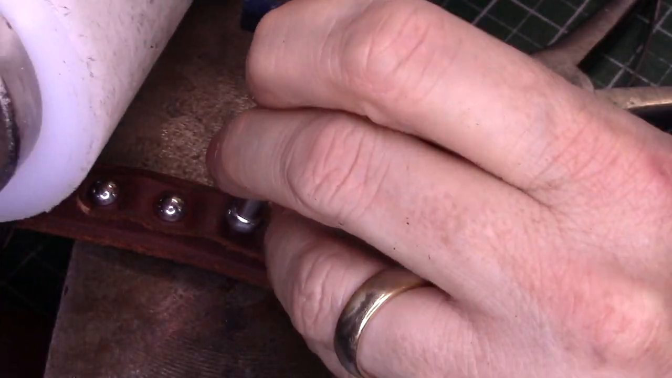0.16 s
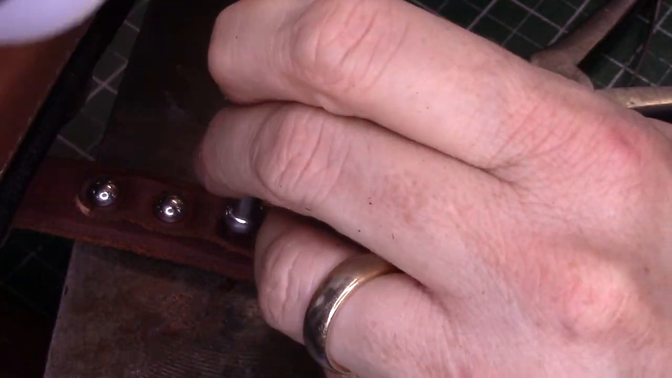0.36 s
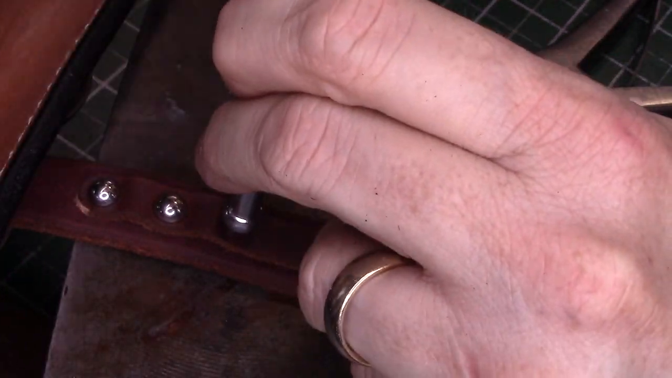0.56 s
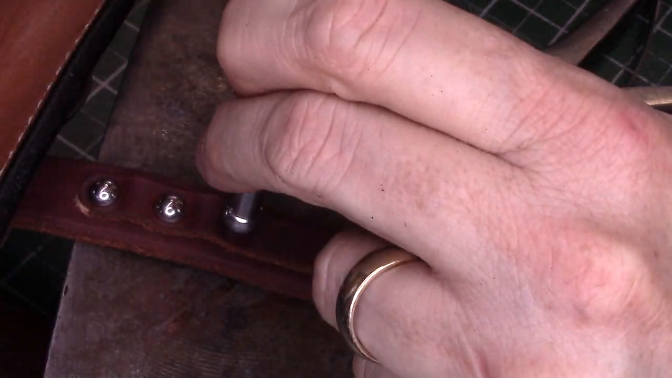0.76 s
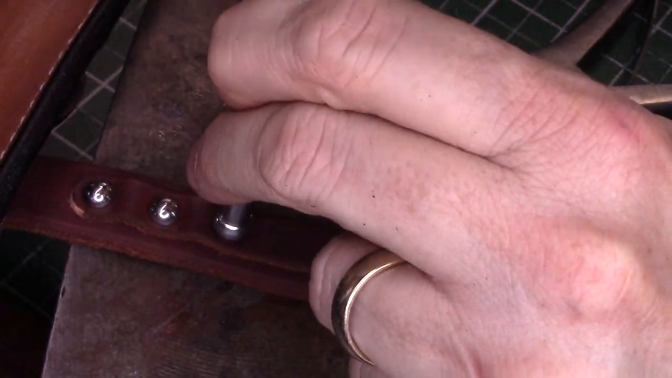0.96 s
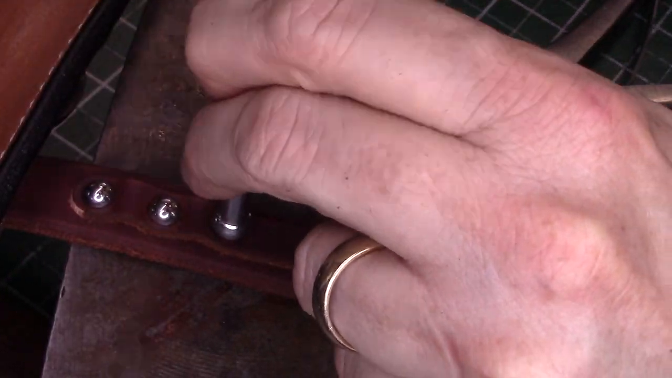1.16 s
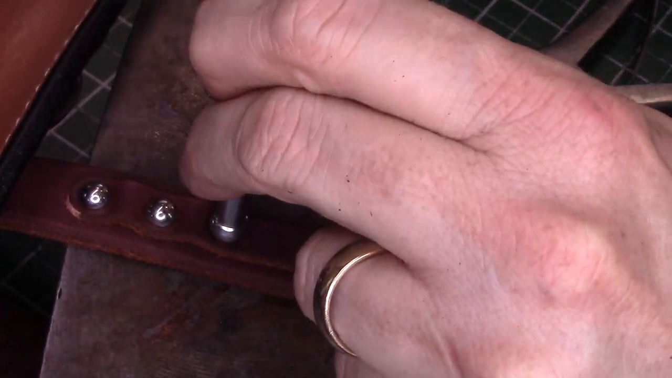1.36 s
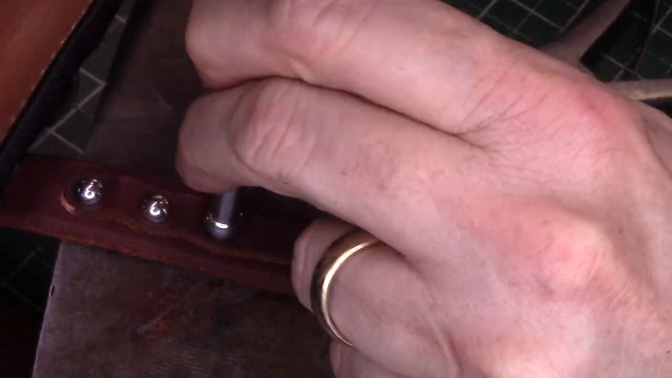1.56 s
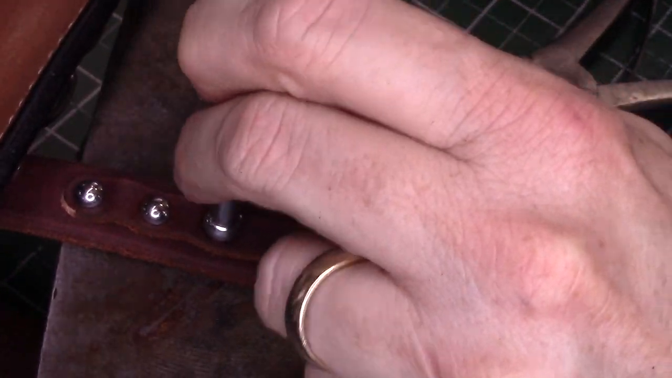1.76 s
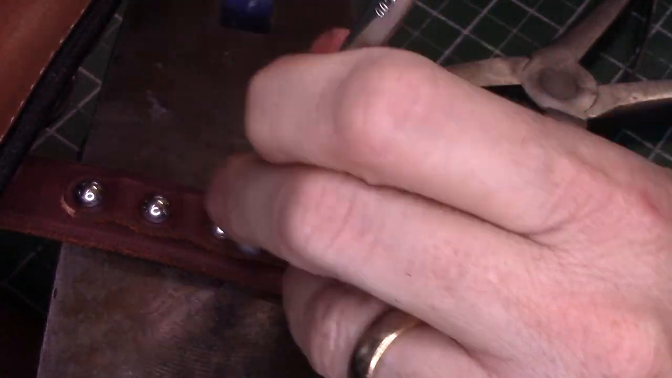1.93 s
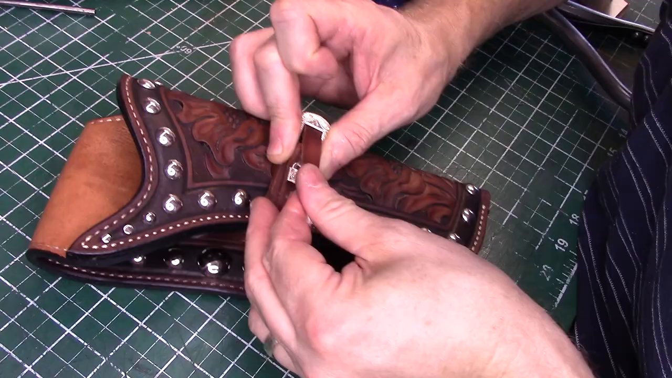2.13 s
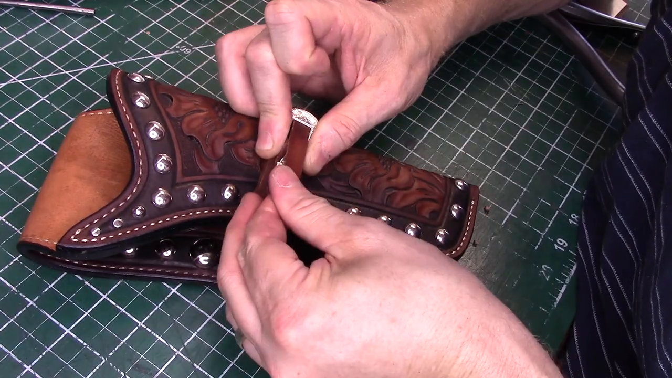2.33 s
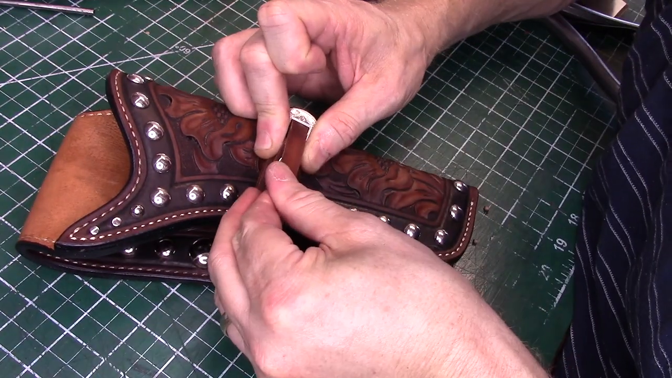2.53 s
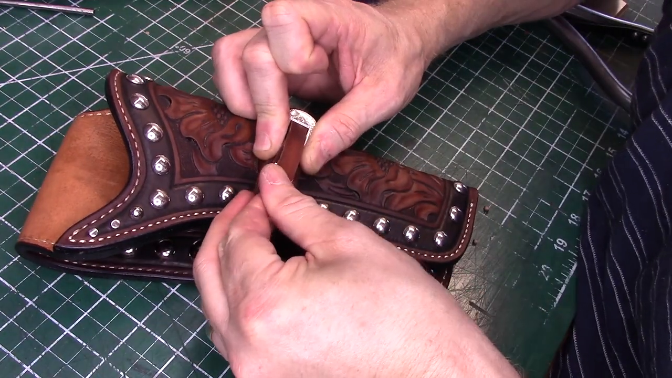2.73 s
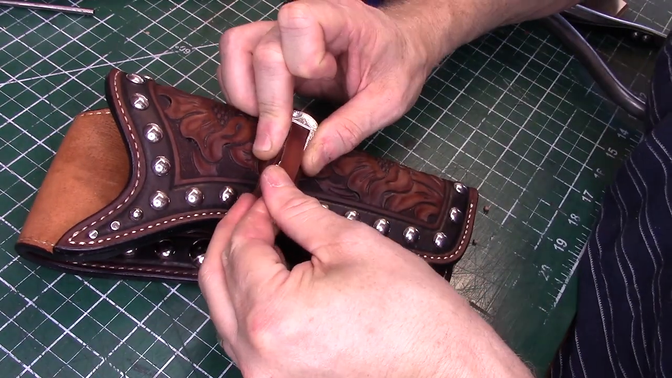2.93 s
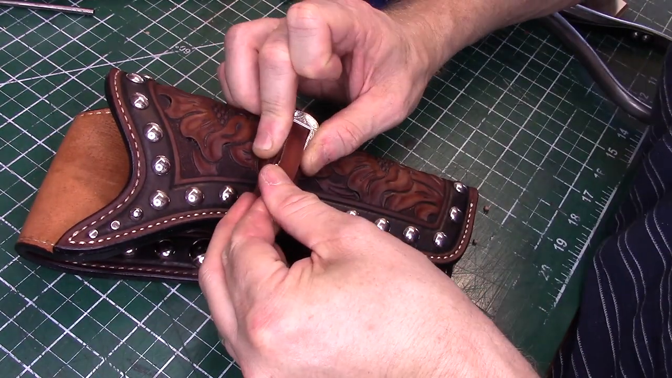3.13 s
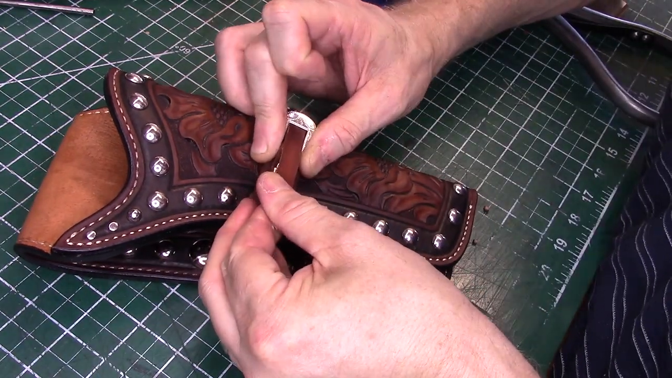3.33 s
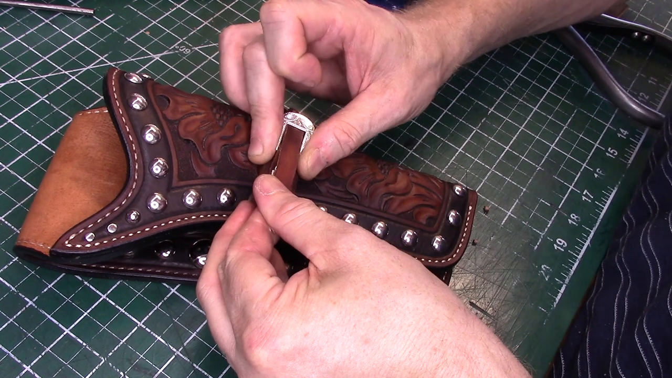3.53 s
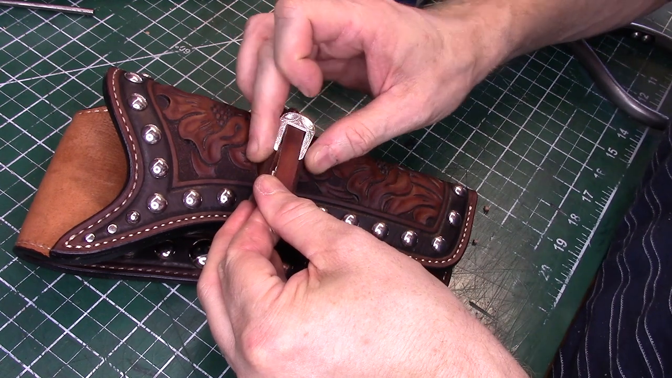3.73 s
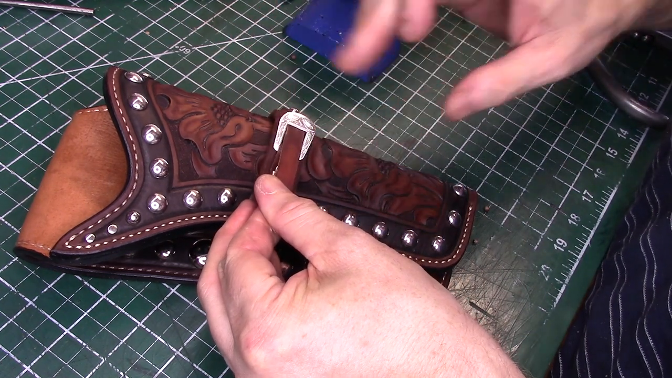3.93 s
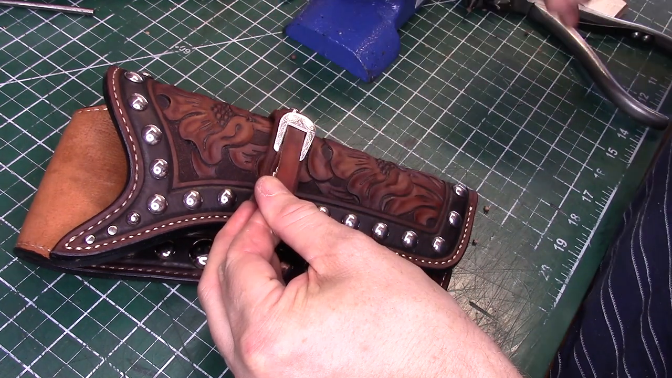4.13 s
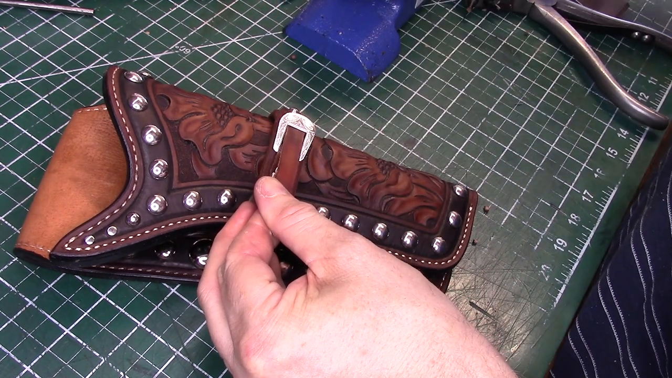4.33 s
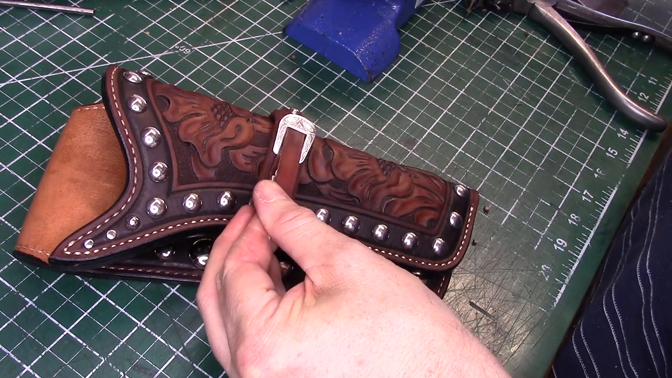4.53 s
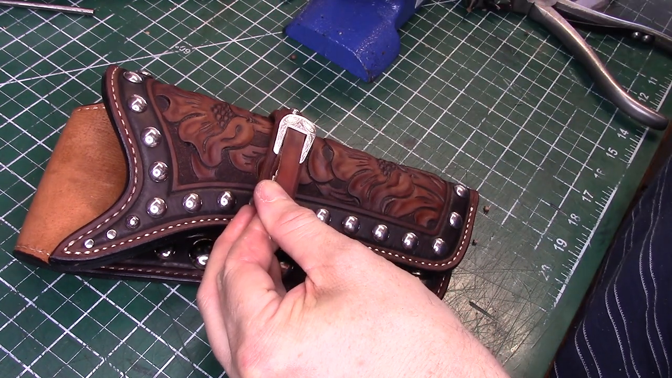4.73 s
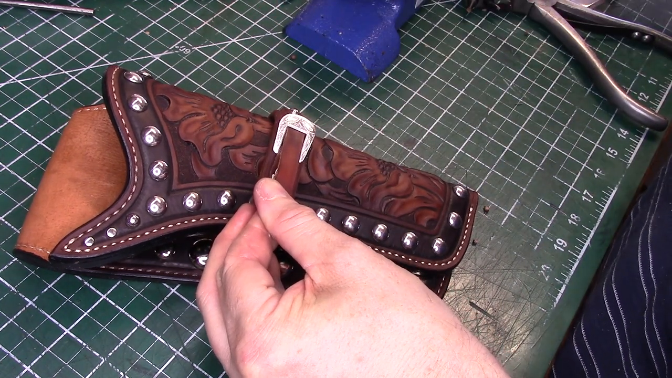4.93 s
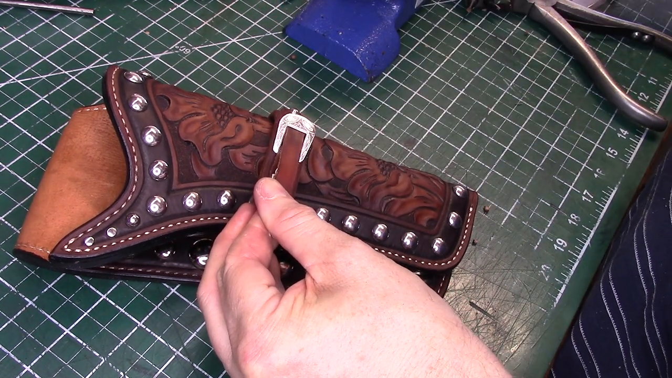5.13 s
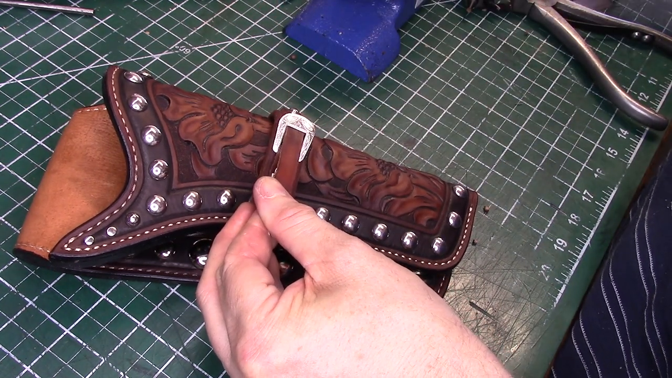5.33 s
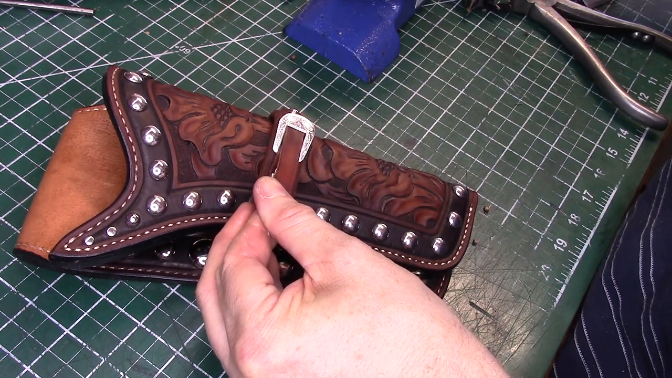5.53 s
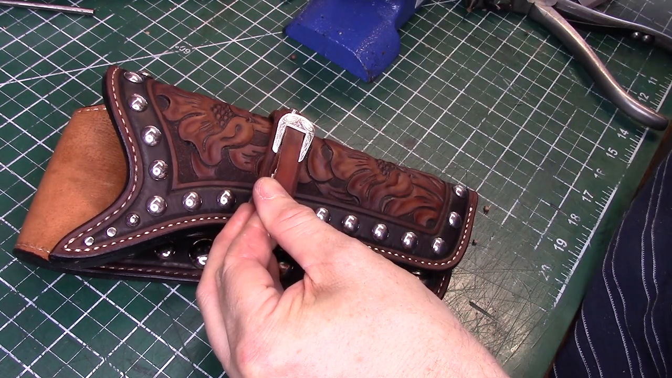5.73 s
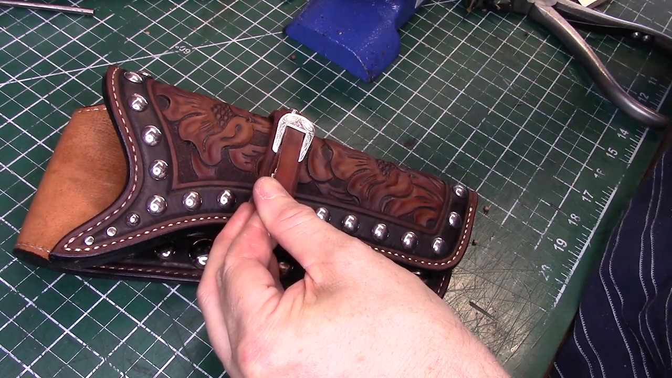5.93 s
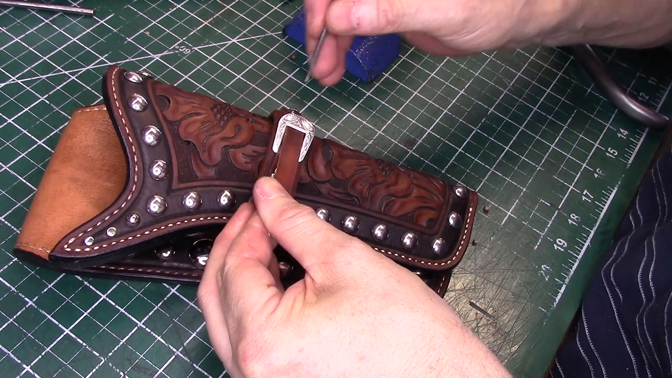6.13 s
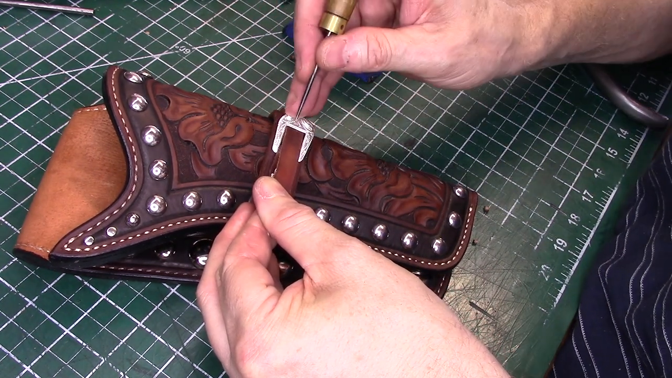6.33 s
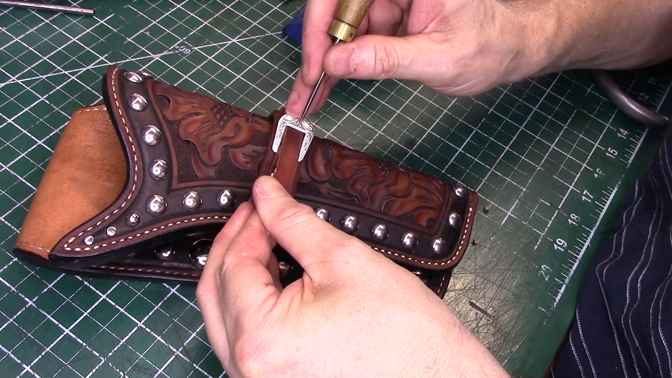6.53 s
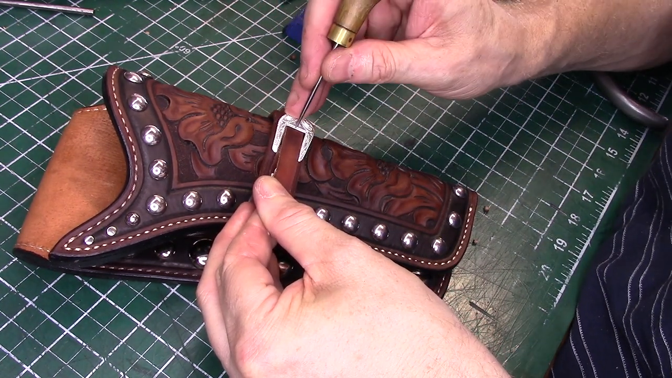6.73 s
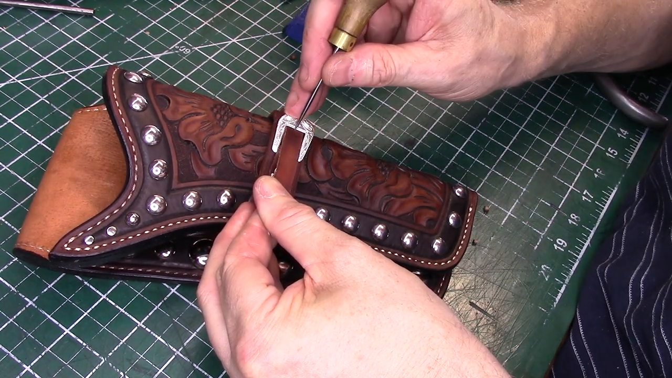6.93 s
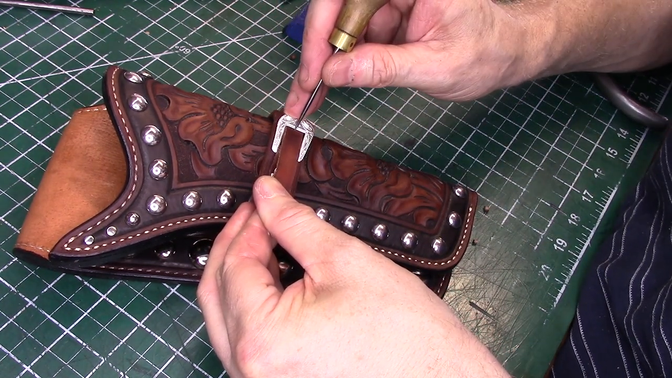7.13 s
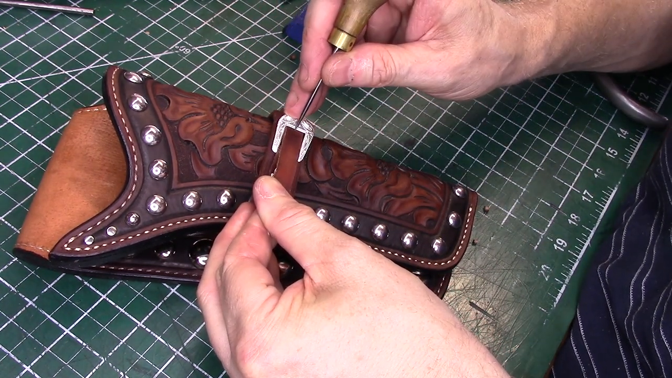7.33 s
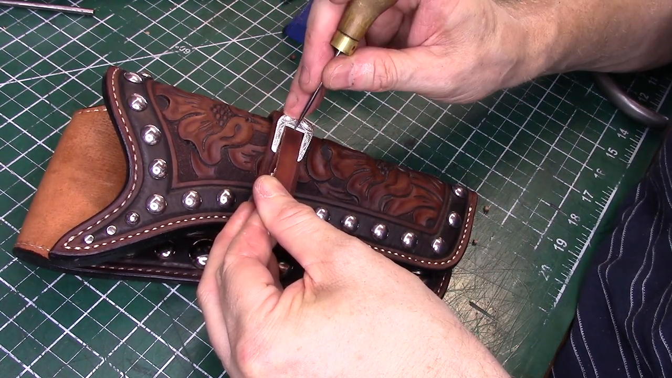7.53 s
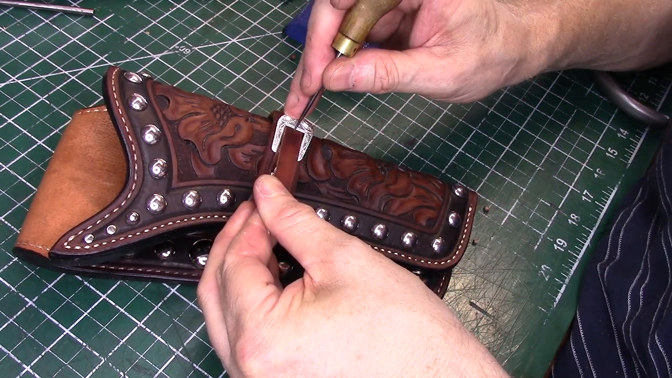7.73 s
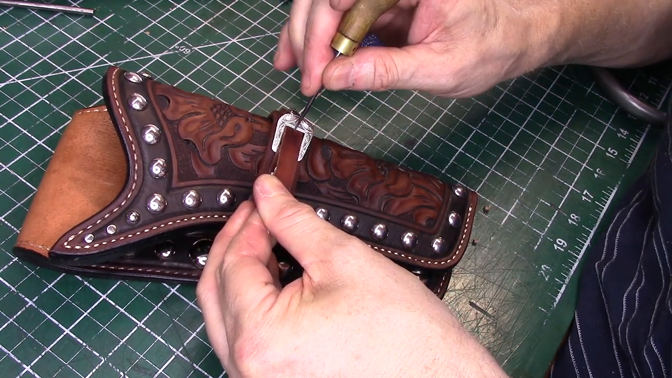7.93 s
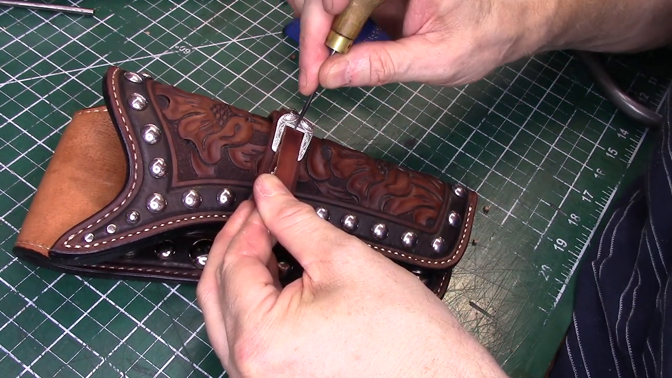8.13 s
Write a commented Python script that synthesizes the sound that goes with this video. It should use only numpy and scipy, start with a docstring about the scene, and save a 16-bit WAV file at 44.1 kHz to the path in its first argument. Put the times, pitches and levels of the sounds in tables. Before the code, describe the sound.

A close, nearly mono sound in a small room with a short reverberation and very faint low hiss. At about 0.8, 1.2 and 1.55 seconds a mallet drives a steel setter: hard, short metallic cracks, each stronger and the last brightest, with a woody bench boom and the slab slapping and bouncing for about a tenth of a second. Near-quiet follows until 2.15, when the room noise abruptly becomes louder and fuller. From there to about 4.2 a leather strap is pulled tight, creaking in dense, irregular dry snaps with soft rubbing and a hollow body. From 4.35 to 5.6 steel tools clink, jingle and scrape, strongest at 4.4, with bright rasps and small bench knocks. Then sparse single leather slips, small and dull, tick irregularly over the steady hiss until just after 8 seconds.

```python
"""Leatherwork at a bench, heard close up, in a small room that hisses faintly throughout.
First a mallet drives a rivet setter three times: the steel rod cracks, the bench booms and the slab bounces.
Then a cut leads to a second shot with louder room noise, in which a strap creaks tight in small slips.
Next an awl is picked from among steel tools, which clink as ringing modes and scrape as filtered noise.
The awl prods the strap, and single slips of the leather follow to the end."""
import sys
import numpy as np
from scipy import signal
from scipy.fft import rfft, irfft, next_fast_len
from scipy.io import wavfile
from scipy.ndimage import uniform_filter1d

SR = 44100
rng = np.random.default_rng(int(sys.argv[2]) if len(sys.argv) > 2 else 0)


def inscribe(sig):
    """Save sig as 16-bit PCM at rate SR to the path in sys.argv[1].

    A 1-D sig is mono; a 2-D sig holds one channel per row.
    Samples are clipped to [-1, 1] before scaling.
    """
    pcm = np.round(np.clip(np.atleast_2d(sig).T, -1, 1) * 32767)
    wavfile.write(sys.argv[1], SR, pcm.astype(np.int16))


N = 360297
TIME = np.arange(N) / SR  # time in the scene (s)
AGE = np.arange(SR // 2) / SR  # time since a contact (s)
BENCH_WET_DB = -14  # the room's answer to a knock on the bench

# Mallet blows: (time [s], crack level [dB], treble level [dB], strongest ring [Hz],
# thud level [dB], boom relative to the thud [dB])
BLOWS = [(0.8235, -13.5, -28, 1850, -16.5, 5), (1.192, -10.5, -27, 3380, -9, 2.5),
         (1.5606, -5, -17, 3060, -5, -8)]
# Pulls on the strap: (start [s], length [s], rubbing level [dB], level of the small slips [dB])
PULLS = [(2.156, 0.077, -46.5, -36), (2.291, 0.22, -47.5, -38.5), (2.557, 0.062, -56, -50),
         (2.721, 0.14, -50.5, -49), (2.869, 0.051, -45.5, -32.5), (3.153, 0.119, -52, -41),
         (3.383, 0.091, -54, -37.5), (3.65, 0.65, -58.5, -60)]
# Steel dragged over steel and mat: (start [s], length [s], level [dB])
DRAGS = [(4.325, 0.29, -55), (4.411, 0.018, -36), (4.48, 0.13, -62), (4.666, 0.035, -40),
         (4.754, 0.12, -47), (4.898, 0.0068, -40), (4.991, 0.032, -40), (5.168, 0.082, -46.5),
         (5.305, 0.1, -50.5), (5.508, 0.01, -46.5)]


def amp(db):
    """Turn decibels into a gain."""
    return 10 ** (np.asarray(db) / 20)


def unit(x):
    """Scale a sound to an rms of 1."""
    return x / np.sqrt(np.mean(x ** 2) + 1e-20)


def punch(x):
    """Scale a short sound to the energy of 10 ms at an rms of 1."""
    return x / np.sqrt(np.sum(x ** 2) / (SR / 100) + 1e-20)


def along(points, hz):
    """Read a curve of (frequency [Hz], value) points on a log frequency axis."""
    point_hz, values = np.transpose(points)
    return np.interp(np.log(hz + 1), np.log(point_hz + 1), values)


def filtered(x, response):
    """Shape the spectrum of x with a gain that depends on frequency."""
    size = next_fast_len(N + SR // 2)
    spectrum = rfft(x, size) * response(np.fft.rfftfreq(size, 1 / SR))
    return irfft(spectrum, size)[..., :N]


def cut(x, hz, kind):
    """Remove what lies below ("high") or above ("low") a frequency."""
    return signal.sosfilt(signal.butter(3, min(hz, SR / 2 - 1), kind, fs=SR, output="sos"), x)


def add(track, s, sound):
    """Mix a sound into the track at time s."""
    part = track[round(s * SR):][:len(sound)]
    part += sound[:len(part)]


def burst(t60, t=AGE):
    """Noise that dies away by 60 dB in t60 seconds."""
    return rng.standard_normal(len(t)) * amp(-60 * t / t60)


def ring(modes, scatter_db, detune, t=AGE):
    """Dying tones of a struck object, a little different at every contact."""
    hz, db, t60 = np.transpose(modes)[:, :, None]
    size, drift = rng.standard_normal((2, len(modes), 1))
    fading = amp(db + scatter_db * size - 60 * t / t60)
    tones = np.sin(2 * np.pi * hz * (1 + detune * drift) * t)
    return np.sum(fading * tones, axis=0)


def favoured(modes, pitch, lift_db):
    """The point of contact strengthens the modes near one pitch."""
    def lift(hz):
        return lift_db * np.exp(-(np.log(hz / pitch) / .09) ** 2)
    return [(hz, db + lift(hz), t60) for hz, db, t60 in modes]


def in_room(x, wet_db):
    """A contact with its own diffuse tail, which builds up over the first reflections."""
    # Fading of the room: (frequency [Hz], time to fade by 60 dB [s])
    room_fade = [(120, .27), (350, .24), (800, .2), (3000, .23), (12000, .25)]
    hz, t, z = signal.stft(rng.standard_normal(len(AGE)), SR, nperseg=256)
    fading = amp(-60 * t / along(room_fade, hz)[:, None])
    tail = signal.istft(z * fading, SR, nperseg=256)[1][:len(AGE)]
    tail = tail * (1 - np.exp(-(AGE / 0.0027) ** 2))
    wet = signal.fftconvolve(x, tail / np.linalg.norm(tail))[:len(AGE)]
    return np.pad(x, (0, len(AGE) - len(x))) + amp(wet_db) * wet


def contact(x, db, treble_db, low_hz):
    """Harder contacts ring more in the treble, so middle and treble each get a level."""
    middle = cut(cut(x, low_hz, "high"), 4600, "low")
    treble = cut(cut(x, 5400, "high"), 11200, "low")
    return amp(db) * punch(middle) + amp(treble_db) * punch(treble)


def chatter(t60, rise, rough_db, t):
    """A contact that slips several times within a few milliseconds."""
    knots = rng.standard_normal(len(t) // 32 + 2)  # a random grip every 32 samples
    grip = amp(rough_db * np.interp(np.arange(len(t)) / 32, np.arange(len(knots)), knots))
    return punch(burst(t60, t) * grip * (1 - np.exp(-t / rise)))


def friction(rate, spread_db, smooth):
    """Tiny random catches, rate per second, over smooth sliding noise."""
    caught = rng.random(N) < rate / SR
    catches = caught * rng.standard_normal(N)
    catches = catches * amp(spread_db * np.clip(rng.standard_normal(N), -2, 2))
    return unit(catches) + smooth * rng.standard_normal(N)


def strokes(rows, attack, release):
    """Gain of hand movements that take hold, last a while and let go."""
    gain = np.zeros(N)
    for s, length, db, *_ in rows:
        hold = np.clip((TIME - s) / attack, 0, 1)
        let_go = np.exp(-np.maximum(TIME - s - length, 0) / release)
        gain += amp(db) * hold * let_go
    return gain


def uneven(start, length, rate):
    """Moments of stick and slip in a stroke, each with a random size (normal) and place (0-1)."""
    chance = rng.random((64, 2))
    times = start + (np.arange(len(chance)) + chance[:, 0]) / rate
    rows = zip(times, rng.standard_normal(len(times)), chance[:, 1])
    return [row for row in rows if row[0] < start + length]


def air(spectrum, db, whine_db):
    """Steady room noise with a narrow band of hiss in it."""
    noise = filtered(rng.standard_normal(N), lambda hz: amp(along(spectrum, hz)))
    whine = filtered(rng.standard_normal(N), lambda hz: 1 / (1 + ((hz - 4510) / 140) ** 2))
    return amp(db) * unit(noise) + amp(whine_db) * unit(whine)


def background():
    """Faint room noise up to a cut, and a louder, differently coloured one after it."""
    # Colour of the air before and after the cut: (frequency [Hz], relative level [dB])
    quiet_air = [(15, -42.5), (25, -26.5), (61, -12), (157, 1), (416, -5), (451, -9), (516, -9),
                 (1370, -18), (1740, -19.5), (4490, -26), (5280, -32.5), (5730, -26.5), (6210, -31),
                 (16000, -41)]
    loud_air = [(25, -47), (45, -21), (70, -7.5), (170, 2.5), (320, -1.5), (480, -7), (620, -7),
                (1000, -13), (2100, -21), (4000, -24.5), (5200, -30), (8000, -32.5), (11000, -38.5),
                (16000, -46)]
    second_shot = np.clip((TIME - 2.157) / 0.0017, 0, 1)  # the cut at 2.157 s, a 1.7 ms crossfade
    quiet = (1 - second_shot) * air(quiet_air, -69.5, whine_db=-88)
    return quiet + second_shot * air(loud_air, -50, whine_db=-69.0)


def rubbing():
    """Leather slides on leather in a dense, uneven rustle that keeps the hollow of the case sounding."""
    # Colour of the rustle: (frequency [Hz], relative level [dB])
    rub_colour = [(120, -11), (240, 11), (450, 3), (610, -3.5), (900, 1), (1400, -8), (3200, -11.5),
                  (7000, -16), (11000, -26), (14000, -46), (16000, -42)]
    hollow_hz, hollow_width_hz, hollow_db = 644, 45, 12.5  # the leather case hums
    grain = friction(rate=2600, spread_db=1.5, smooth=.6)
    stroke = strokes(PULLS, attack=0.0026, release=0.15)
    knots = rng.standard_normal(N // 256 + 2)  # a random grip every 256 samples
    grip = amp(2 * np.interp(np.arange(N) / 256, np.arange(len(knots)), knots))

    def colour(hz):
        hum = hollow_db / (1 + ((hz - hollow_hz) / hollow_width_hz) ** 2)
        return amp(along(rub_colour, hz) + hum)
    return stroke * unit(filtered(grain * grip, colour))


def scrape():
    """Sliding steel rasps in tiny catches; treble glints come and go as the point of contact wanders."""
    # Colour of the scrape: (frequency [Hz], relative level [dB])
    scrape_colour = [(120, -24), (250, 1.5), (450, 9.5), (1100, -3), (1700, -5), (2300, -10.5), (2900, -9),
                     (4800, -21), (5900, -13), (7000, -17), (8500, -29), (13300, -32), (16000, -44)]
    grain = friction(rate=1800, spread_db=2.5, smooth=.6)
    stroke = strokes(DRAGS, attack=0.0073, release=0.041)
    hz, _, z = signal.stft(grain, SR, nperseg=512)
    # random spots, smoothed over frequency and then over time
    glints = uniform_filter1d(rng.standard_normal(z.shape), size=3, axis=0)
    glints = unit(uniform_filter1d(glints, size=6, axis=1))
    depth_db = along([(1200, 1), (4000, 5.5)], hz)[:, None]
    glinting = signal.istft(z * amp(depth_db * glints), nperseg=512)[1][:N]
    return amp(5.5) * stroke * unit(filtered(glinting, lambda hz: amp(along(scrape_colour, hz))))


def rasps():
    """An edge sliding along steel keeps its bright modes ringing, louder as the pressure grows."""
    # Swelling rasps of an edge drawn along a tool: (start [s], length [s], level [dB])
    rasp_times = [(4.589, 0.023, -35), (4.702, 0.02, -36.5), (5.29, 0.056, -39), (5.603, 0.011, -50.5)]
    # Modes of the rasped steel: (frequency [Hz], level [dB], time to fade by 60 dB [s])
    rasp_modes = [(3280, -5, 0.038), (4300, -15, 0.016), (6030, -9, .025), (6550, 3.5, 0.017),
                  (7350, 4, 0.02), (8520, 1.5, 0.031), (11000, 5, 0.0076), (12800, -1, .01)]
    grain = friction(rate=1200, spread_db=2, smooth=.4)
    steel = signal.fftconvolve(grain, ring(rasp_modes, scatter_db=1, detune=.003))[:N]
    swell = np.zeros(N)
    for row in rasp_times:
        swell += strokes([row], attack=row[1], release=0.0096)  # rises over its whole length
    return swell * (unit(steel) + 0.13 * grain)


def singing(x):
    """A tool lying free sings on thinly after an edge slides over it."""
    # Modes of the free tool: (frequency [Hz], level [dB], time to fade by 60 dB [s])
    free_modes = [(2972, -8, .2), (4253, -11, .35), (5943, 0, .35), (6282, -2, .22), (8400, -9, .09),
                  (10600, -9, .1)]
    tone = ring(free_modes, scatter_db=1, detune=.001)
    return x + amp(-13) * signal.fftconvolve(x, tone / np.linalg.norm(tone))[:N]


def jingles():
    """A dragged tool lightly brushes its neighbours; the rows are like those of the clinks."""
    # Lowest and highest strongest ring: (low [Hz], high [Hz])
    low, high = (2930, 10950)
    rows = []
    for start, length, db in DRAGS:
        for s, size, place in uneven(start, length, rate=51):
            level = db - 2 * size
            pitch = low * (high / low) ** place
            rows.append((s, level + 13.5, level + 6, pitch, .65))
    return rows


def tools():
    """Steel tools chatter as they touch; each has its own size, and the grip damps it more or less."""
    # Tools knocking together: (time [s], level [dB], treble level [dB], strongest ring [Hz],
    # ring time [times the usual])
    clinks = [(4.377, -29.5, -35, 12740, 2.2), (4.4157, -6, -14, 2920, 1.25), (4.4335, -41, -42, 8500, .6),
              (4.448, -20, -35, 2680, 0.31), (4.459, -21, -26, 9670, 0.39), (4.49, -18, -18, 5650, 0.68),
              (4.493, -15, -13, 4430, 0.95), (4.674, -27, -20.5, 10800, 0.57),
              (4.695, -18, -23.5, 1513, 0.79), (4.704, -20, -20, 7570, 0.89),
              (4.7501, -13, -13.5, 8690, 0.8), (4.758, -19.5, -16, 3004, 0.94),
              (4.825, -35, -32, 5050, 0.36), (4.8674, -35, -37, 3690, 0.54), (4.904, -18, -38, 3090, 0.31),
              (4.91, -17, -31, 3550, 0.93), (4.929, -29, -31, 3690, 0.39), (4.997, -11.5, -18, 2390, 0.5),
              (5.015, -24.5, -45, 2480, 1.4), (5.108, -35, -40, 7770, 0.65),
              (5.153, -29.5, -37.5, 2920, 0.82), (5.184, -26.5, -51, 4300, 0.19),
              (5.214, -26, -23.5, 9080, 0.56), (5.261, -25.5, -29, 6100, 0.7),
              (5.292, -30, -41, 1660, 0.43), (5.3432, -21.5, -25, 4350, 0.95),
              (5.515, -28.5, -45, 1640, .35), (5.528, -31.5, -30.5, 5980, 1.1),
              (5.568, -34.5, -40, 11280, 0.76)]
    # Usual modes of a tool: (frequency [Hz], level [dB], time to fade by 60 dB [s])
    steel_modes = [(1316, -2.5, 0.043), (1600, -8.5, 0.06), (2200, -10, 0.042), (2404, 2, 0.024),
                   (2934, 0, 0.05), (3440, -3, 0.048), (3940, -8.5, 0.067), (4396, 4.5, 0.02),
                   (5060, -1.5, 0.049), (5854, 8.5, 0.028), (6130, -6.5, 0.1), (6620, -4, 0.027),
                   (7560, -3, 0.051), (8240, -3.5, 0.033), (8950, -2, 0.031), (10000, 3.5, 0.018),
                   (10420, 2, 0.013), (12140, 10, 0.008), (13400, 1, 0.035)]
    out, t = np.zeros(N), AGE[:SR // 4]
    for s, db, treble_db, pitch, ring_time in clinks + jingles():
        # shift all modes so that the nearest one falls on the pitch
        scale = pitch / min(steel_modes, key=lambda mode: abs(mode[0] - pitch))[0]
        sized = [(hz * scale, level, t60 * ring_time) for hz, level, t60 in steel_modes]
        modes = favoured(sized, pitch, lift_db=10)
        chime = ring(modes, scatter_db=3.5, detune=.006, t=t) * (1 - np.exp(-t / .001))
        clink = punch(chime) + .4 * chatter(t60=.034, rise=.0015, rough_db=2.5, t=t)
        touch = contact(clink, db - 15.5, treble_db - 12.5, low_hz=1160)
        add(out, s, in_room(touch, wet_db=-13.5))
    return out


def small_slips():
    """The strap creeps in small slips as long as it is pulled; the rows are like those of the big slips."""
    rows = []
    for start, length, _, level in PULLS:
        for s, size, place in uneven(start, length, rate=36):
            db = level - 2 * size
            edge_db = 17 * (place - .5)  # slips at an edge are brighter and less hollow
            rows.append((s, db, db + 3.5 - edge_db, db - 12 + edge_db))
    return rows


def leather():
    """Each slip snaps twice in quick succession and sounds the hollow of the stiff leather case."""
    # Distinct slips, under the fingers and then under the awl:
    # (time [s], snap level [dB], body level [dB], treble level [dB])
    slips = [(0.0193, -56, -54.5, -57), (0.074, -51, -61, -80), (0.236, -59, -68, -64.5),
             (1.48, -61, -67, -65.5), (1.777, -50.5, -45, -64), (1.949, -70, -75, -71.5),
             (2.1668, -21, -29.5, -31), (2.2471, -36, -48, -38.5), (2.2872, -45, -39, -48),
             (2.2981, -36, -29.5, -42.5), (2.311, -33, -32, -43), (2.329, -33, -39, -40),
             (2.344, -45, -40, -46), (2.3664, -36.5, -36, -51), (2.3985, -44, -34, -45),
             (2.4145, -42, -32.5, -41.5), (2.4304, -29, -30.5, -37.5), (2.451, -26.5, -30, -39),
             (2.4609, -30.5, -25, -50), (2.4848, -29.5, -27.5, -42), (2.501, -42, -29, -40),
             (2.5154, -31, -29.5, -42), (2.533, -39, -37, -53), (2.5614, -33.5, -27, -45),
             (2.5984, -27, -30.5, -34.5), (2.622, -29, -26, -36.5), (2.645, -33.5, -52, -41),
             (2.729, -41, -39.5, -50), (2.7376, -33.5, -36, -38), (2.745, -32, -33, -40.5),
             (2.8139, -37, -43, -55), (2.8438, -28.5, -35.5, -42.5), (2.895, -29, -28, -38),
             (2.9123, -33, -39, -39), (2.932, -36, -30.5, -40), (2.9616, -32.5, -42, -48),
             (3.1585, -30.5, -31, -55), (3.1735, -31, -30, -45), (3.1946, -28.5, -29, -51),
             (3.211, -25.5, -26.5, -42.5), (3.257, -30.5, -37, -48), (3.265, -28, -30.5, -46),
             (3.2947, -29.5, -27.5, -63), (3.3537, -46, -58, -49), (3.382, -31, -29, -54),
             (3.391, -29.5, -34, -41), (3.4312, -32.5, -27, -65), (3.462, -25.5, -29, -45.5),
             (3.6464, -42, -55, -49), (3.6648, -34, -39, -44.5), (3.687, -29.5, -29.5, -48),
             (3.73, -39, -35.5, -59), (3.745, -40, -54, -49), (3.762, -37, -42, -51.5),
             (3.8044, -41, -31, -62), (3.863, -38, -63, -47), (3.8917, -39, -34, -52),
             (3.953, -42, -59, -48), (3.975, -41, -36.5, -51), (3.993, -28, -30, -45),
             (4.05, -37.5, -51, -47.5), (4.068, -38.5, -34.5, -51), (4.105, -30, -34, -38),
             (4.1168, -32.5, -27.5, -47), (4.156, -32.5, -32, -44), (4.192, -29, -30.5, -44),
             (4.5474, -26, -28.5, -37.5), (5.6462, -24.5, -29, -36.5), (5.773, -39.5, -45, -56.5),
             (6.0121, -38, -37, -48), (6.131, -35, -41.5, -46.5), (6.2308, -40.5, -40.5, -53.5),
             (6.2944, -41.5, -37.5, -57), (6.3324, -31, -30, -45), (6.423, -37.5, -38, -54),
             (6.644, -36, -34, -51.5), (6.7054, -27, -28, -38.5), (6.7119, -30.5, -28, -42),
             (6.9449, -27, -28.5, -35.5), (7.2374, -47, -42.5, -57.5), (7.416, -28.5, -31.5, -38),
             (7.519, -32, -37, -38), (7.5314, -40, -34.5, -63), (7.561, -48, -37.5, -74),
             (7.583, -52, -43, -54), (7.691, -47, -48, -53), (8.01, -46, -39.5, -59),
             (8.076, -35, -33, -44)]
    # Modes of the leather surface: (frequency [Hz], level [dB], time to fade by 60 dB [s])
    skin_modes = [(890, -2.5, 0.0094), (1398, -18.5, 0.068), (1750, -13, 0.012), (2180, -4, 0.029),
                  (2900, 2, 0.018), (3470, 3.5, 0.0079), (4200, 2.5, 0.0038), (5600, -8, 0.0026),
                  (6600, -7, 0.0024), (8140, -2, 0.00098), (10040, -1, 0.00053)]
    # Delay before a slip catches again: (shortest [s], longest [s])
    second_catch = (.0018, .0036)
    hollow_modes = [(605, 0, .06), (690, -6, .04), (1300, -11, .025)]  # columns as skin_modes
    out, t = np.zeros(N), AGE[:SR // 8]
    for s, db, body_db, treble_db in slips + small_slips():
        slip = .55 * chatter(t60=.018, rise=.0005, rough_db=2, t=t)
        for lag, size in (0, 1), (rng.uniform(*second_catch), rng.uniform(.4, 1)):
            click = punch(np.ones(1))
            add(slip, lag, size * (.45 * click + .55 * punch(burst(t60=.004, t=t))))
        skin = signal.fftconvolve(slip, ring(skin_modes, scatter_db=1.5, detune=.04, t=t))[:len(t)]
        snap = contact(punch(skin) + 0.3 * punch(slip), db - 10.5, treble_db - 3.5, low_hz=890)
        hollow = ring(hollow_modes, scatter_db=4, detune=.05, t=t) * (1 - np.exp(-t / .0012))
        add(out, s, in_room(snap + amp(body_db - 6.5) * punch(hollow), wet_db=-12.5))
    return out


def slaps():
    """The slab first lands flat on the bench after each blow: one abrupt, quickly damped clack."""
    # Landings of the slab: (time [s], level [dB])
    landings = [(0.8582, -20), (1.2328, -15.5), (1.6138, -9)]
    out = np.zeros(N)
    for s, db in landings:
        tone = np.cos(2 * np.pi * 500 * AGE) * amp(-60 * AGE / 0.003)  # 500 Hz, gone in 3 ms
        clack = tone + 0.17 * burst(t60=.016)
        add(out, s, in_room(amp(db) * cut(clack, 2600, "low"), wet_db=BENCH_WET_DB))
    return out


def bench():
    """Each blow is a short push and rebound; heavy ones make the bench top boom, hard ones knock higher."""
    # Knocks on the bench top, from the bouncing slab and later from tools:
    # (time [s], level [dB], pitch of the push [Hz], boom relative to the push [dB])
    bumps = [(0.8574, -13.5, 433, -2.5), (0.8706, -15.5, 520, -1), (0.882, -16.5, 303, -4),
             (.895, -16, 304, -5.5), (1.2315, -9.5, 520, 2), (1.239, -22, 293, 9), (1.262, -11.5, 345, -13),
             (1.2939, -20, 380, -5), (1.6123, -9, 435, 0.5), (1.6273, -13, 256, -17), (1.643, -16, 427, -4),
             (1.656, -16.5, 327, -3), (1.828, -45, 298, -5), (2.1665, -19, 660, -16.5),
             (4.357, -28.5, 463, -16), (4.416, -29, 486, -10), (4.453, -23, 438, -12),
             (4.697, -19.5, 440, -11), (4.753, -20, 394, -5), (4.908, -31, 500, -8.5),
             (4.998, -20.5, 580, -27), (5.184, -23, 298, 0), (5.192, -40, 215, 10.5), (5.209, -26, 273, -1),
             (5.291, -26, 485, -10), (5.415, -20.5, 354, -7), (5.514, -26.5, 407, -20),
             (5.567, -18, 378, -15), (5.612, -29.5, 414, -12)]
    # Modes of the bench top: (frequency [Hz], level [dB], time to fade by 60 dB [s])
    bench_modes = [(128, -11, .17), (152, -7.5, .16), (255, -16, .08), (287, -4, .1), (318, 1, .11),
                   (345, -7, .09), (447, -15, .09), (600, -17, .07), (890, -24, .07), (980, -28, .06)]
    thud_lag_s, thud_hz = 0.0012, 330  # the push reaches the bench just after the crack
    out = np.zeros(N)
    thuds = [(s + thud_lag_s, db, thud_hz, boom_db) for s, *_, db, boom_db in BLOWS]
    for s, db, hz, boom_db in thuds + bumps:
        u = np.pi * hz * (AGE - .0025)
        push = (2 * u ** 2 - 1) * np.exp(-u ** 2)
        boom = ring(bench_modes, scatter_db=1, detune=.015) * (1 - np.exp(-AGE / .003))
        knock = punch(cut(cut(burst(t60=0.05), 2.4 * hz, "low"), hz, "high"))
        clatter = punch(cut(cut(burst(t60=0.098), 520, "low"), 200, "high"))
        blow = push - amp(boom_db - 5.0) * boom + 0.039 * knock + 0.18 * clatter
        add(out, s, amp(db) * in_room(blow, wet_db=BENCH_WET_DB))
    return cut(out, 88, "high")


def setter():
    """The hand-damped steel rod gives a short hard crack, and loose things on the bench buzz after it."""
    # The setter jumping on the rivet after each blow:
    # (time [s], level [dB], treble level [dB], strongest ring [Hz])
    rattles = [(0.835, -34, -52, 2750), (0.859, -37, -60, 2730), (0.866, -37, -56, 3050),
               (0.8697, -23.5, -43.5, 2700), (0.873, -22.5, -40, 2900), (.893, -27, -48, 1400),
               (1.202, -24.5, -49.5, 3170), (1.233, -24.5, -41, 1850), (1.243, -26.5, -49, 2730),
               (1.247, -28.5, -50.5, 1400), (1.255, -24, -43, 3600), (1.294, -31, -45, 2750),
               (1.319, -40.5, -52, 2750), (1.6142, -27, -52, 1400), (1.6268, -22, -41.5, 2700),
               (1.632, -29, -47, 3050), (1.6573, -25.5, -43, 3050), (1.677, -40, -56, 3085),
               (1.686, -33, -51, 2750)]
    # Modes of the rod, and of loose steel shaken on the bench:
    # (frequency [Hz], level [dB], time to fade by 60 dB [s])
    rod_modes = [(1400, -12, .012), (1850, -10, .01), (2750, -3, .009), (3050, -2, .012), (3600, -8, .009),
                 (4600, -8, .009), (5800, -5, .009), (6300, -6, .008), (7600, -12, .008), (8300, -13, .01),
                 (10100, -15, .007)]
    loose_modes = [(1800, -3, .004), (2890, 1.5, .016), (3300, -1, 0.012), (3900, -1.5, 0.0086),
                   (4255, -6.5, 0.016), (6400, -8, 0.0045), (7070, -10.5, .008), (8200, -13, 0.0068)]
    out, t = np.zeros(N), AGE[:SR // 8]
    for s, db, treble_db, pitch in [blow[:4] for blow in BLOWS] + rattles:
        rod = ring(favoured(rod_modes, pitch, lift_db=11), scatter_db=1.2, detune=.012)
        crack = punch(rod) + .25 * punch(burst(t60=.006))
        hit = contact(crack, db - 15.5, treble_db - 9.5, low_hz=1210)
        shake = chatter(t60=.15, rise=.004, rough_db=3, t=AGE)
        loose = signal.fftconvolve(shake, ring(loose_modes, scatter_db=3, detune=.07, t=t))[:len(AGE)]
        buzz = punch(loose) + .45 * cut(shake, 5000, "low")
        add(out, s, in_room(hit + amp(db - 24.5) * buzz, wet_db=-18.5))
    return out


def scene():
    """Everything is nearly mono, with a trace of width above the bass."""
    blows = setter() + bench() + slaps()
    strap = leather() + rubbing()
    steel = tools() + scrape() + singing(rasps())
    mid = blows + strap + steel + background()
    spread = burst(t60=0.075)
    side = signal.fftconvolve(cut(mid, 450, "high"), spread / np.linalg.norm(spread))[:N]
    side = amp(-23.5) * side
    return np.array([mid + side, mid - side]) * amp([[-.15], [.15]])  # right a touch louder


def record(dry):
    """The treble ends steeply at 15.8 kHz."""
    return filtered(dry, lambda hz: 1 / (1 + (hz / 15800) ** 120))


dry = scene()
out = record(dry)
inscribe(out)
```